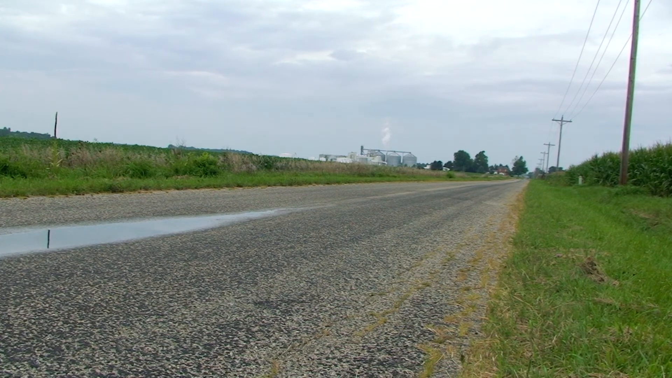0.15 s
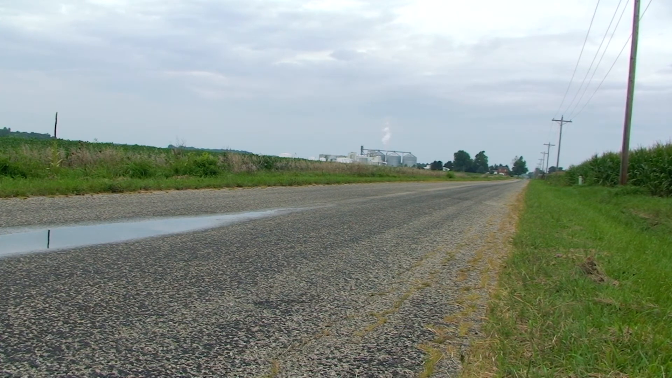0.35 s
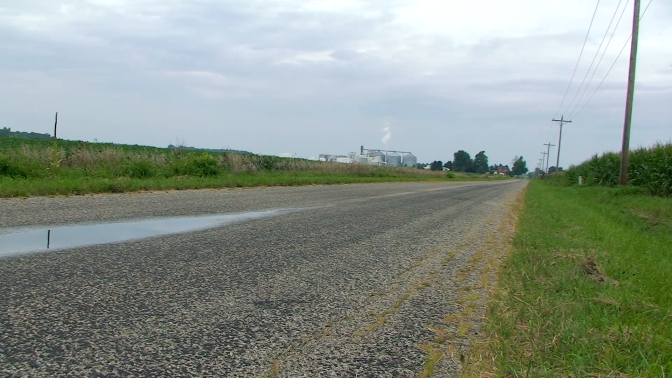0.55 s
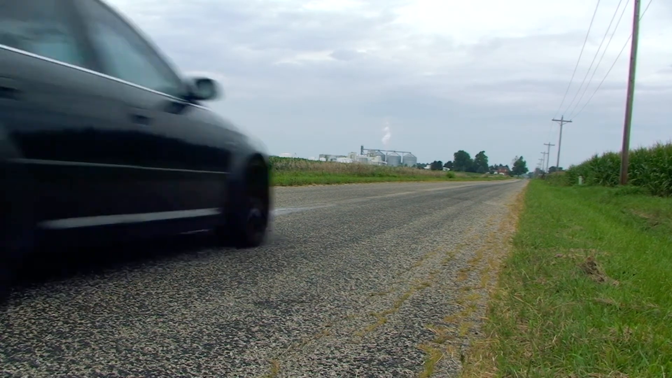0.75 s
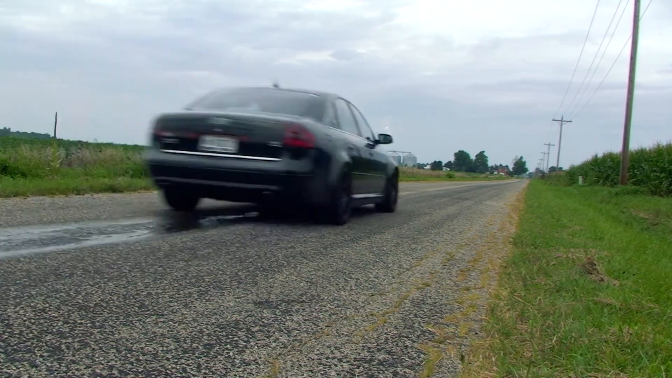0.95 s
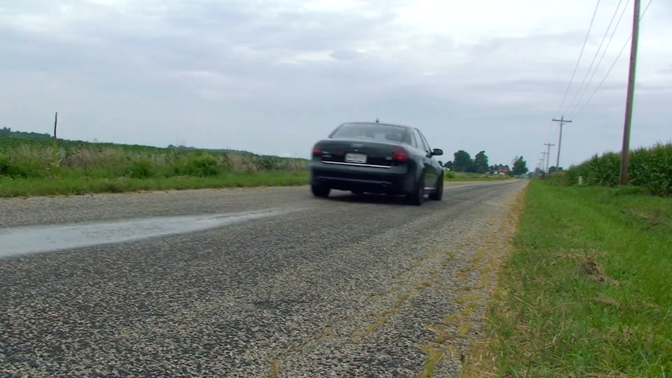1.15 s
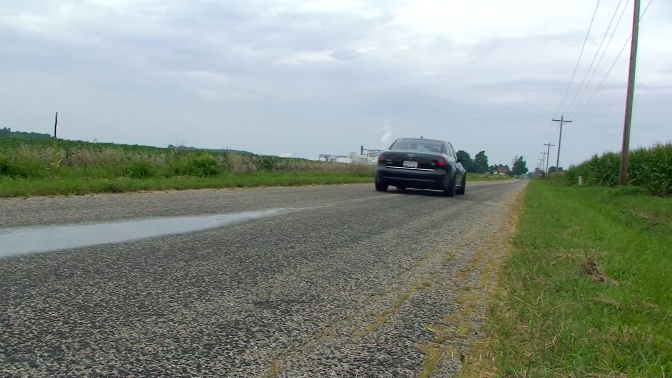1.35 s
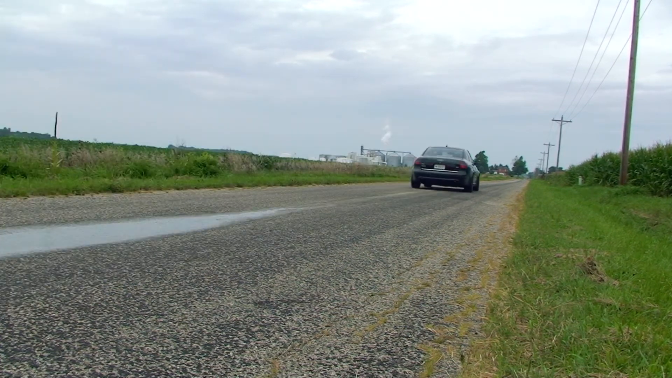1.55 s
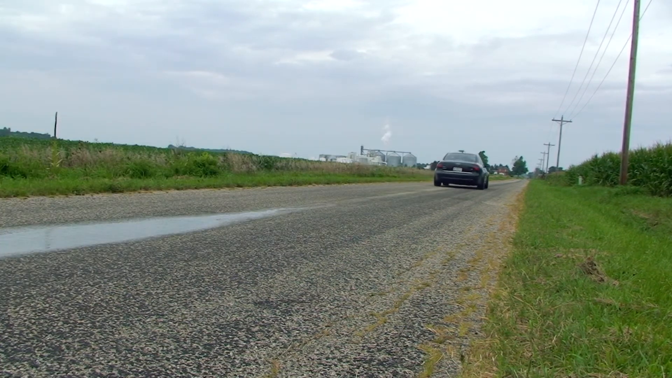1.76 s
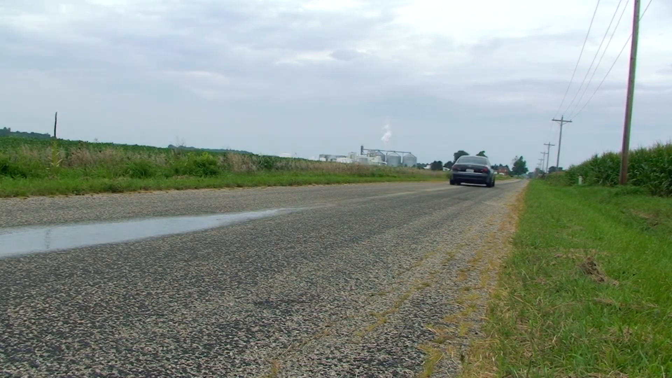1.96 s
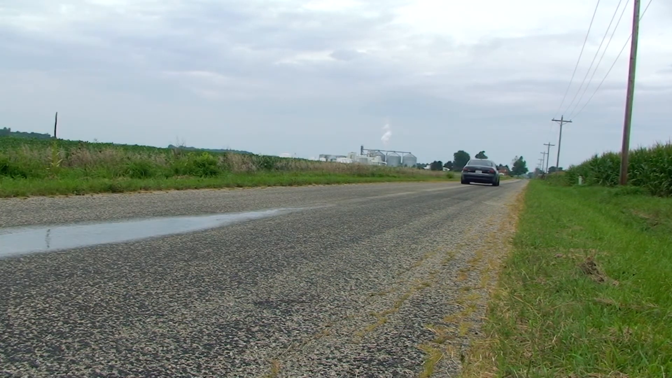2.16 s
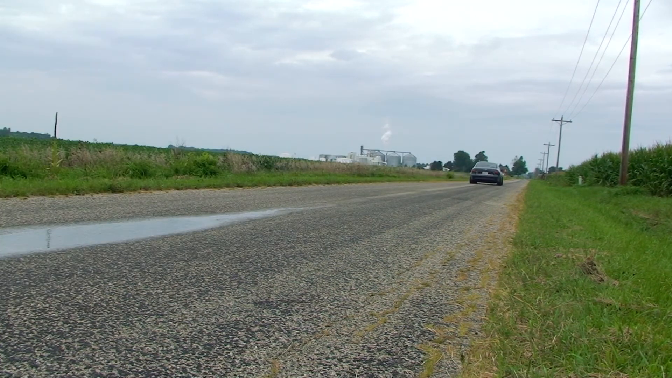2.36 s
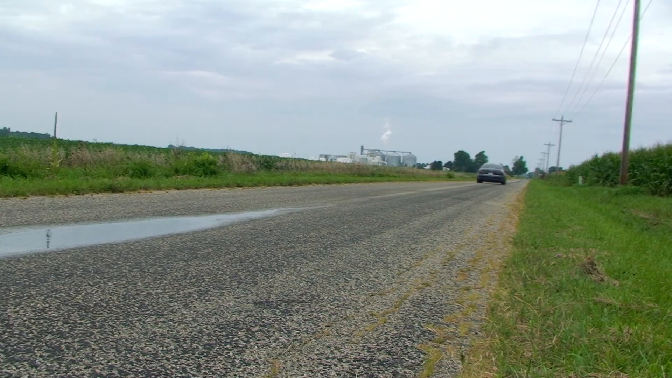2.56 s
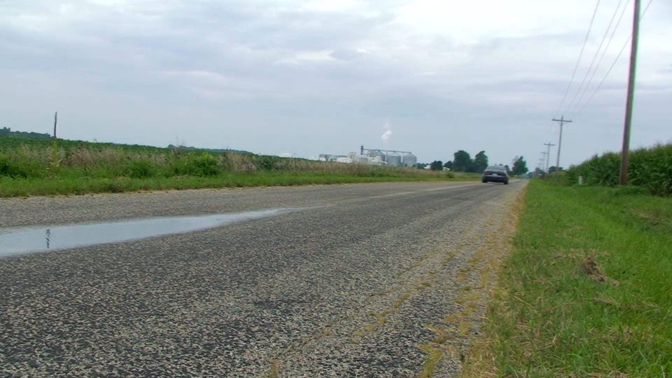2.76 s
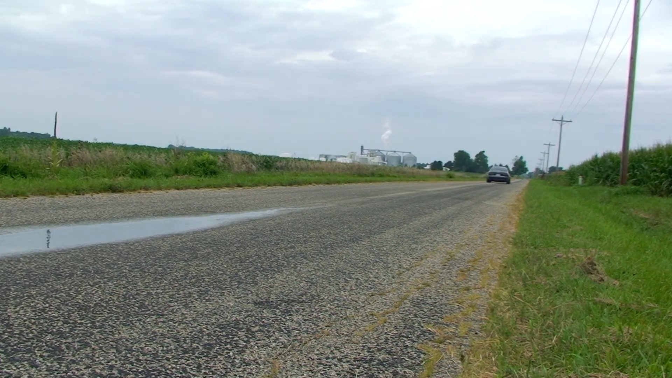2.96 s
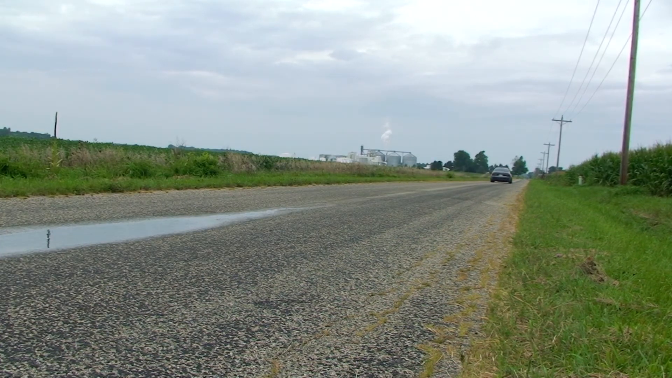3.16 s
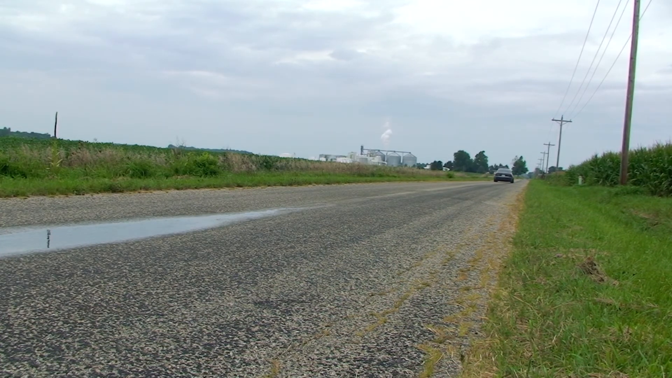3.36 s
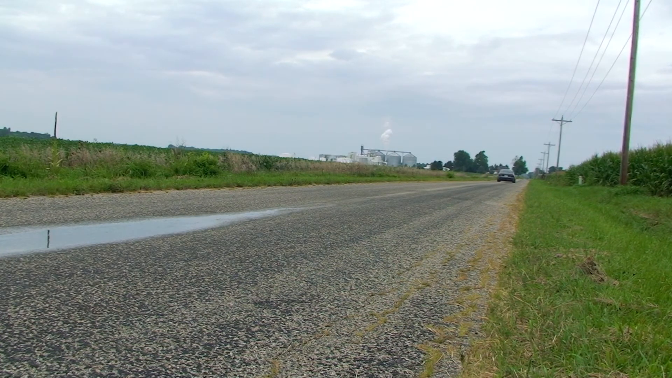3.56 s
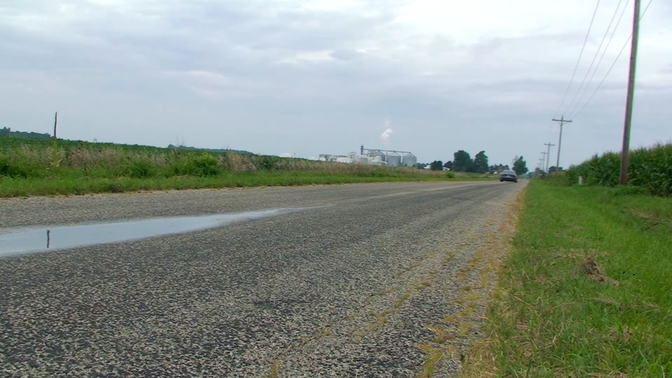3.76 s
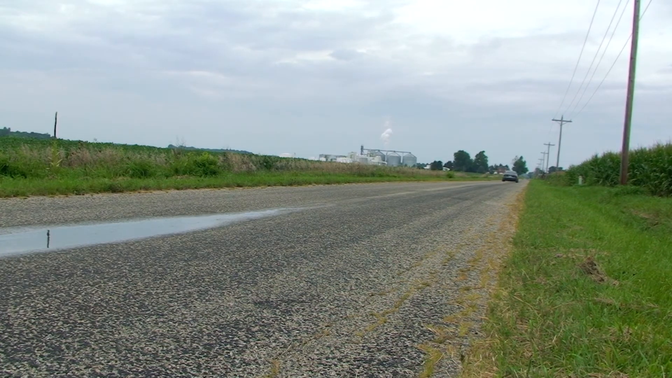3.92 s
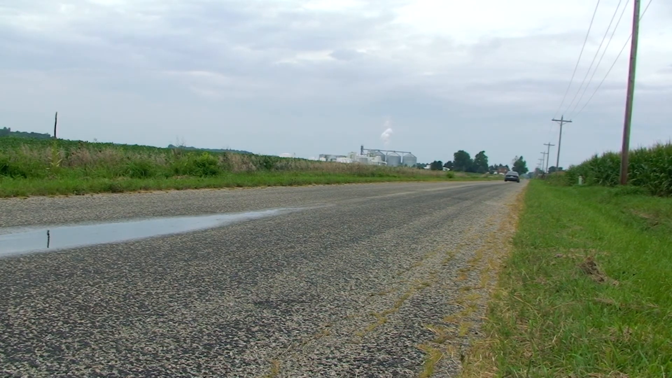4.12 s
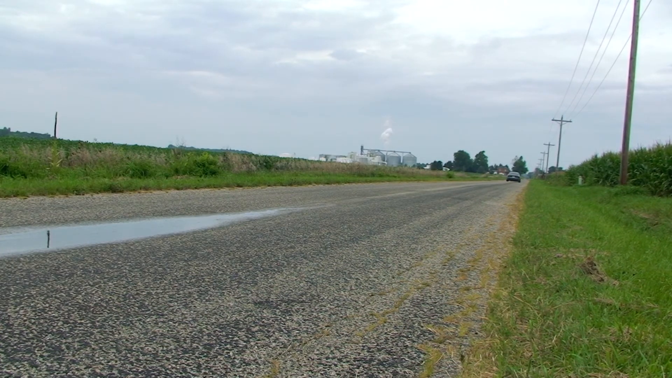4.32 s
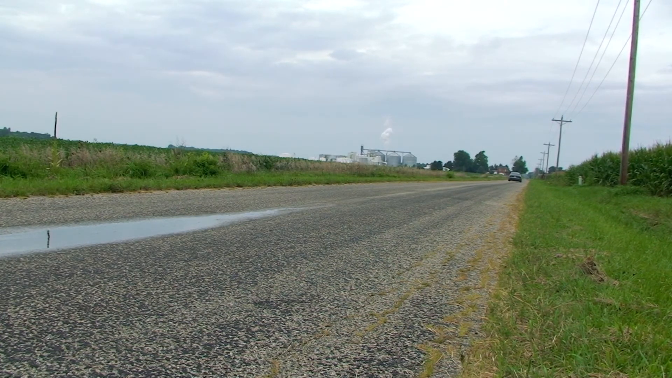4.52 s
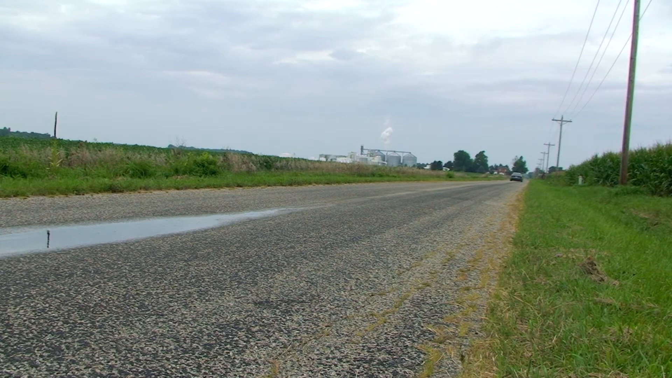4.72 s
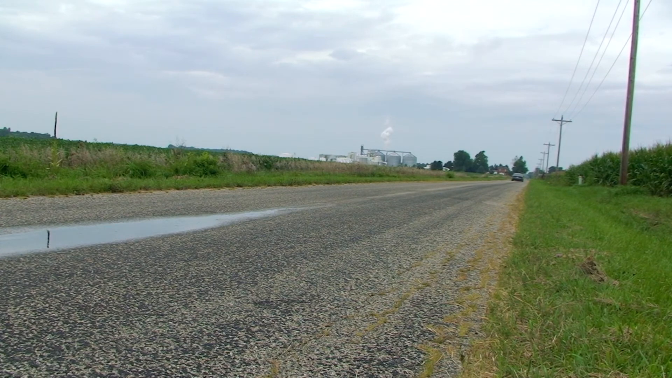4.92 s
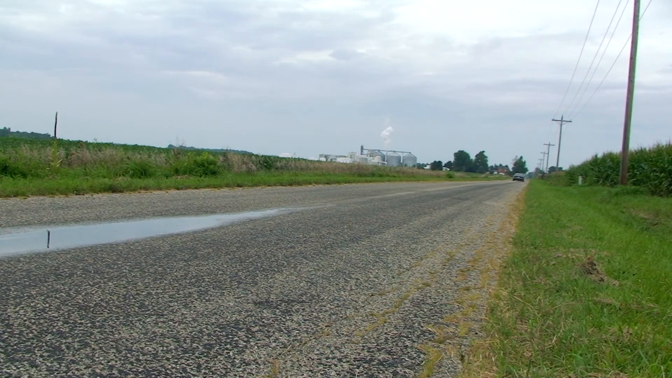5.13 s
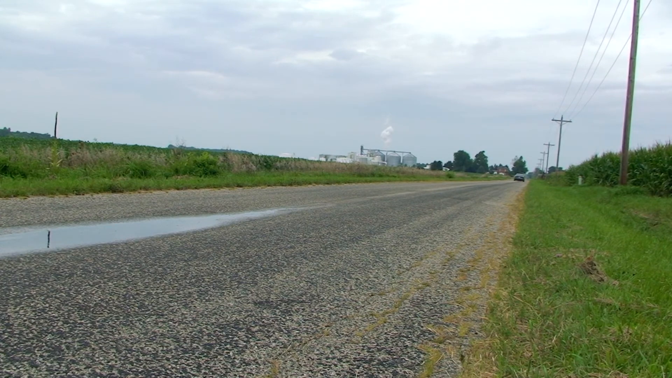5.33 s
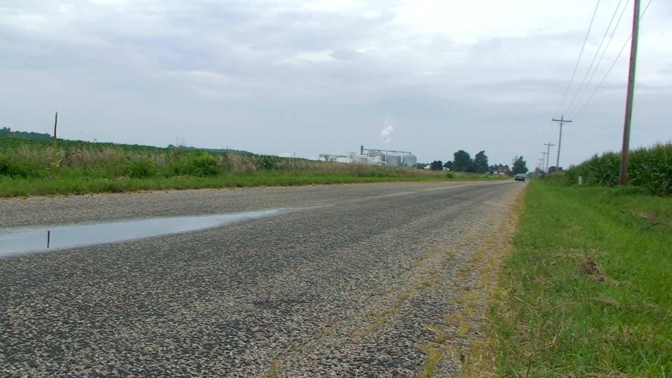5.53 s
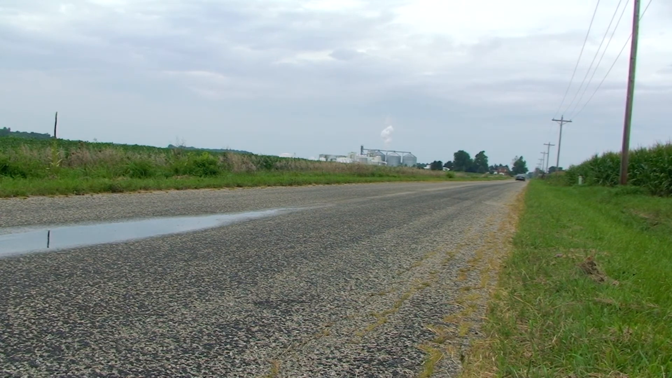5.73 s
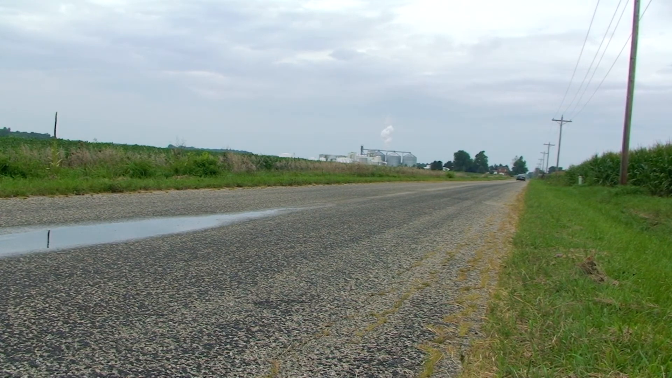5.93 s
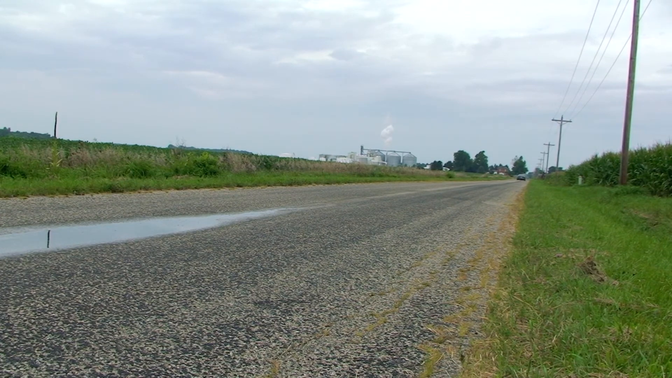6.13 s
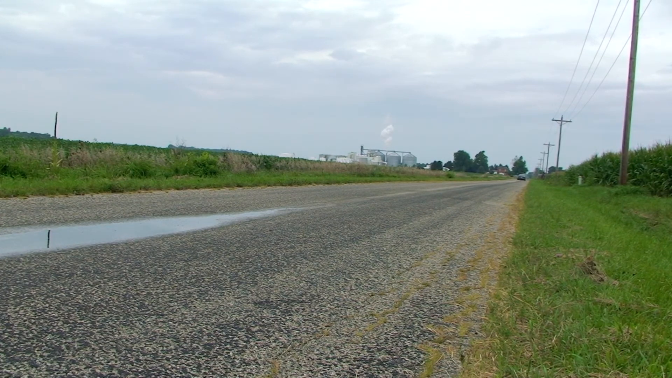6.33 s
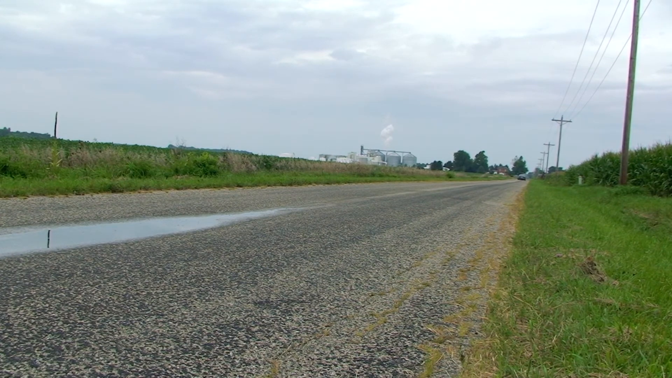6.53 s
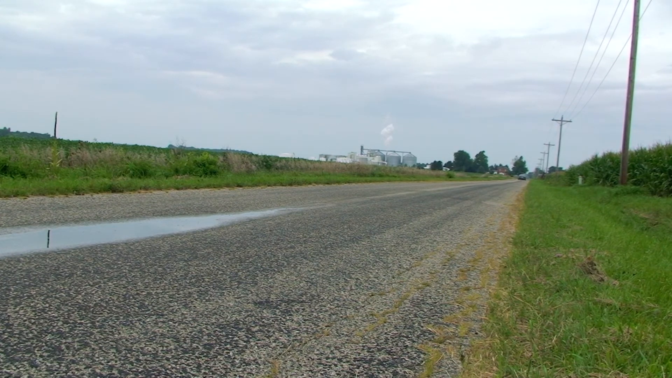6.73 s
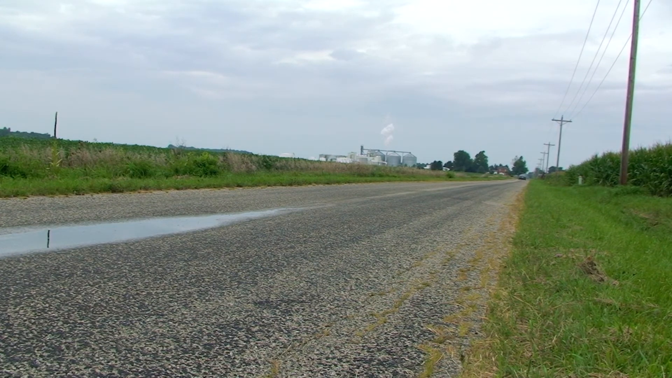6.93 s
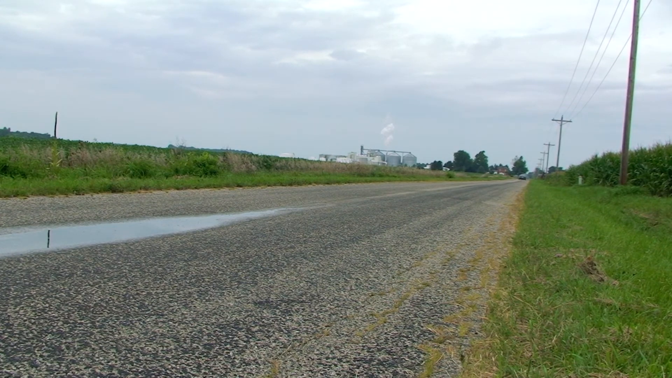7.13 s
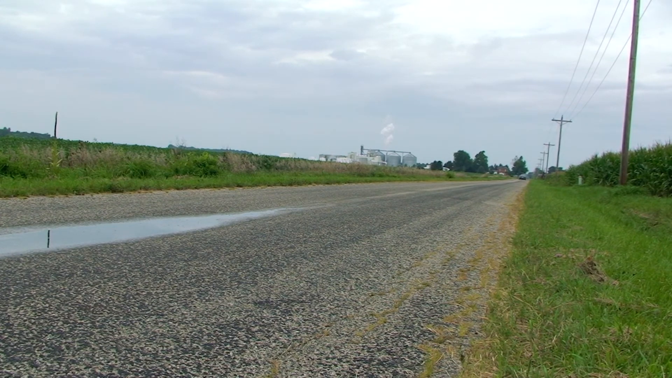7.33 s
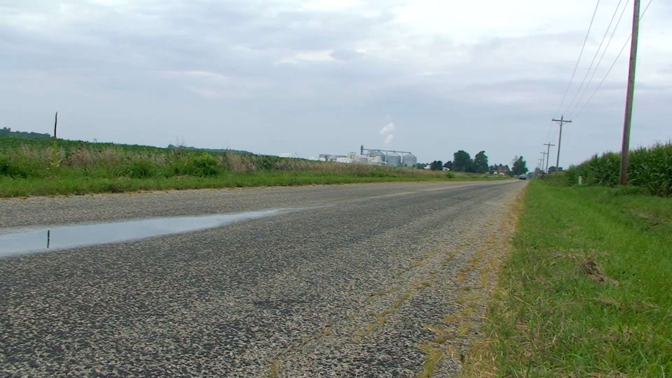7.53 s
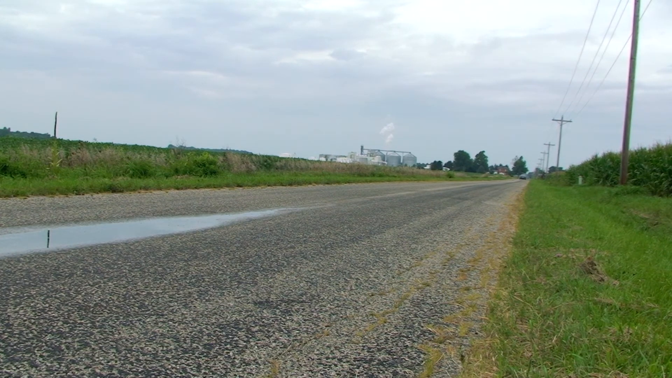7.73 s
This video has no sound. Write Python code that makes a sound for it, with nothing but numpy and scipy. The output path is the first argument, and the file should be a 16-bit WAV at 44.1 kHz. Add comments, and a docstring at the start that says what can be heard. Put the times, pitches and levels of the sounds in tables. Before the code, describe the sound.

A loud V8 car roars past close on the left at full throttle, climbs through its revs, changes gear and recedes as crickets emerge.

```python
"""A V8 saloon with a loud exhaust comes from behind the microphone and passes close on its left at full throttle.
The engine note drops as it goes by, with torn blasts of gas and air, while tyres roar on coarse chip seal.
Down the country road the note climbs with the revs, then slides down into the next gear; crickets in the verge
come through as the car recedes. The engine is a sum of orders of its cycle, with noise ringing in the pipes;
the road is coloured noise that fades with distance, and each cricket is a whistle cut into wing strokes."""
import sys
import numpy as np
from scipy import signal
from scipy.fft import rfft, irfft, next_fast_len
from scipy.io import wavfile
from scipy.ndimage import uniform_filter1d

SR = 44100
rng = np.random.default_rng(int(sys.argv[2]) if len(sys.argv) > 2 else 0)


def unload_wav(signal):
    """Save mono or channel-first audio to the path in sys.argv[1] as 16-bit WAV at rate SR, clipped to [-1, 1]."""
    wavfile.write(
        sys.argv[1],
        SR,
        np.round(np.clip(np.atleast_2d(signal).T, -1, 1) * 32767).astype(np.int16),
    )


N = 347508
T = np.arange(N) / SR  # time [s]

# the car's path: speed, the moment it is abreast of the microphone, its distance then
SPEED_M_S, PASS_S, KERB_M = 24.05, .768, 3.37
SOUND_M_S = 343
BARK_LAG_S = .25  # the bark and the road layers follow the engine's effort later than the boom


# side-on, within this stretch of road, the pipes boom less and bark more
SIDE_ON_AT_M, SIDE_ON_M, SIDE_ON_BOOM_DB, SIDE_ON_BARK_DB = -.5, 5.7, -2.7, 1.5
# just before that the body of the car screens the bark
SCREEN_AT_M, SCREEN_M, SCREEN_DB = -7.2, 3, -3.4
# turbulent share of the exhaust, and what it gains close by, side-on and in the gear change
RASP_DB, RASP_NEAR_DB, RASP_NEAR_M, RASP_SIDE_ON_DB, RASP_SHIFT_DB = -18.2, 4.5, 18, 7, 2
EXHAUST_PAN_SHARE = .46  # the exhaust swings across less than the tyres
# pipe resonances that the turbulence rings: (centre [Hz], width [Hz], level [dB])
PIPE_RESONANCES = [(105, 45, -7), (168, 78, -4), (308, 78, -2), (410, 60, -5), (495, 110, -4),
                   (620, 104, -1), (823, 81, -8)]


def exhaust(cycle_hz, turn, along, shift, rasp_trim_db=-2, puff=0.48):
    """The engine note, and turbulent puffs at each firing that ring the pipes."""
    side_on = bump(along, SIDE_ON_AT_M, SIDE_ON_M, order=6)
    boom_db = carried("boom", along) + SIDE_ON_BOOM_DB * side_on
    bark_db = carried("bark", along, BARK_LAG_S) + SIDE_ON_BARK_DB * side_on
    bark_db = bark_db + SCREEN_DB * bump(along, SCREEN_AT_M, SCREEN_M)

    rough_db = RASP_DB + RASP_NEAR_DB * bump(along, 0, RASP_NEAR_M)
    rough_db = rough_db + RASP_SIDE_ON_DB * side_on + RASP_SHIFT_DB * np.sin(np.pi * shift)
    rough = np.clip(undb(rough_db), 0, .9)
    note = twin_pipes(engine_note(cycle_hz, turn, rough, boom_db, bark_db), along)

    firings = np.cos(2 * np.pi * 8 * turn)  # eight to a cycle
    gas = rng.standard_normal(N) * (1 + puff * firings)
    rasp = 0
    for i, (hz, width, db) in enumerate(PIPE_RESONANCES):
        ring = resonate_twice(gas, hz, 2 * width)
        rasp = rasp + undb(db) * ring * (-1) ** i
    flow = np.hypot(undb(boom_db), undb(bark_db))
    rasp = unit(rasp) * rough * flow * undb(rasp_trim_db)

    pan_db = PAN_FAR_DB + EXHAUST_PAN_SHARE * swing(along)
    return ports(note + crackle(turn) + blasts(along, turn) + rasp, pan_db) * place(0, pan_db)


# engine speed at the car in the low gear: (time [s], cycles of all eight cylinders per second [Hz])
LOW_GEAR = [(0, 36.25), (4.45, 49.05), (4.75, 50.4), (5.13, 50.6)]
# engine speed at the car in the next gear: (time [s], cycles of all eight cylinders per second [Hz])
HIGHER_GEAR = [(5.75, 35.31), (5.92, 36.32), (6.8, 36.03), (7.88, 36.96)]
# the gear change: when the throttle lifts, how long the revs fall, and the power of time by which they fall
LIFT_S, SHIFT_S, SHIFT_POWER = 5.131, .617, 1.9


def engine_speed(along):
    """Doppler-shifted cycle rate, and gear change progress 0-1: the revs climb, then fall into the next gear."""
    shift = np.clip((T - LIFT_S) / SHIFT_S, 0, 1) ** SHIFT_POWER
    hz = (1 - shift) * curves(LOW_GEAR)[0] + shift * curves(HIGHER_GEAR)[0]
    return hz * doppler(along), shift


# the tail pipes trail the middle of the car and pass nearer the microphone
PIPE_AFT_M, PIPE_KERB_M = .5, 2.5


def doppler(along):
    """Pitch heard over pitch sent, from the speed at which the tail pipes recede from the microphone."""
    past = along - PIPE_AFT_M
    return 1 / (1 + SPEED_M_S * past / np.hypot(past, PIPE_KERB_M) / SOUND_M_S)


# how far the pipes spread the orders in time, a row for each voice: (boom, bark [turns per order squared])
ORDER_SMEAR = [(.04, -.02), (-.05, -.06), (.085, -.23), (.185, -.125), (.185, -.075), (-.08, .085),
               (-.185, -.22), (.18, -.065)]


def engine_note(cycle_hz, turn, rough, boom_db, bark_db, waver_db=.7, low_waver_db=.6, scatter=.17, churn=55):
    """Orders of the engine cycle; turbulence frays each one into a narrow band."""
    step, orders = 64, np.arange(1, 33)  # slow changes are worked out every 64 samples
    t, rough = T[::step], rough[::step]
    size = len(t)
    gains = order_gains(t, np.outer(orders, cycle_hz[::step]), boom_db[::step], bark_db[::step])
    crank, spin, out = np.exp(2j * np.pi * turn), 1, 0
    for k, gain in zip(orders, gains):
        spin = spin * crank
        shake = k / 16
        # the pipes delay the orders unequally, which sets how lumpy each cycle is
        smear = np.array(ORDER_SMEAR)[:, int(k >= 12)]
        delay = across_voices(t, np.unwrap(2 * np.pi * smear * k ** 2))
        # high orders waver most in the moving air
        phase = scatter * shake ** 2 * walk(14, size=size) - delay
        waver = undb((low_waver_db + waver_db * shake) * walk(6, size=size))
        turbulence = walk(churn, size=size) + 1j * walk(churn, size=size)
        fray = rough * np.sqrt(shake / 2) * turbulence
        envelope = gain * waver * np.exp(1j * phase) * (np.sqrt(1 - rough ** 2) + fray)
        out = out + np.imag(spin * np.interp(T, t, envelope))
    return out


# voices of the engine, each a table of (order [multiple of the cycle rate], relative level [dB]):
# from ahead, closing in, tail on, from behind, then at low, middle and high revs, and in the next gear
AHEAD = [(2, -20.0), (3, -22.0), (4, -18.0), (5, -15.5), (6, -11.5), (7, -1.0), (8, -5.0), (9, -17.5),
         (10, -13.0), (11, -20.5), (12, -22.5), (13, -15.0), (14, -18.0), (16, 0.0), (17, -7.5), (18, -6.5),
         (21, -13.0), (22, -19.0), (23, -18.5), (24, -19.5), (25, -18.5), (26, -23.5)]
CLOSING = [(2, -19.0), (3, -16.5), (4, -16.0), (5, -14.5), (6, 0.0), (7, 0.0), (8, -0.5), (9, -17.5),
           (10, -12.0), (11, -12.0), (12, -14.5), (13, -12.0), (14, -18), (15, -17), (16, -1.0),
           (17, -14.0), (18, -14.5), (21, -14.5), (23, -22.0), (24, -22.5), (25, -8.0), (26, -16.0)]
TAIL_ON = [(2, -21.5), (3, -19.5), (4, -4.5), (5, -13.0), (6, -1.0), (7, -7.5), (8, -2.5), (9, -6.0),
           (10, -14.5), (11, -12.0), (12, -19.5), (13, -8.0), (14, -6.5), (15, -10.0), (16, -4.0),
           (17, -10.0), (18, -2.0), (19, -12.5), (20, -10.5), (21, -9.0), (22, 0.0), (23, -12.0),
           (24, -17.0), (25, -21.0), (26, -15.0), (27, -17.0), (28, -22.5), (29, -22.5), (30, -10.5),
           (31, -16.0), (32, -21.5)]
BEHIND = [(2, -26.0), (3, -26.0), (4, -5.0), (5, -13.5), (6, 0.0), (7, -11.0), (8, -1.5), (9, -13.5),
          (10, -25.0), (11, -16.5), (12, -20.0), (13, -6.5), (14, -9.0), (15, -6.0), (16, -2.0), (17, -8),
          (18, -15.5), (20, -13.5), (21, -9.0), (22, -12.5), (23, -19.5), (24, -21.0), (26, -19.5),
          (28, -26.0), (29, -21.0), (30, -16.0), (31, -18.5), (32, -14.5)]
LOW_REVS = [(2, -25.5), (3, -20.5), (4, -8.0), (5, -13.0), (6, 0), (7, -10), (8, -3.5), (9, -12), (10, -7),
            (12, -15.5), (13, -6.0), (14, 0.0), (15, -1.5), (16, 0), (17, -7), (18, -14.5), (19, -24.5),
            (20, -11.0), (21, -12.0), (22, -15.0), (23, -17.5), (24, -22.5)]
MID_REVS = [(1, -41), (2, -28.5), (3, -19.5), (4, -17.5), (5, -16), (6, -2.5), (7, -19.5), (8, -5),
            (9, -5.5), (10, -16.5), (11, -18), (12, -8), (13, -12), (14, 1.5), (15, -14), (16, -9),
            (17, -6), (18, -10), (19, -24), (20, -14), (21, -15), (22, -19.5), (23, -17), (24, -11),
            (25, -18), (26, -18), (27, -24), (28, -21)]
HIGH_REVS = [(1, -37), (2, -29), (3, -19), (4, -19.5), (5, -20.5), (6, -6), (7, -22), (8, 0), (9, -14),
             (10, -11), (11, -14.5), (12, -1.5), (13, -8.5), (14, 0), (15, -20.5), (16, -2.5), (17, -7),
             (18, -10.5), (19, -14), (20, -8.5), (21, -12.5), (22, -7), (23, -13), (24, -11), (25, -12),
             (26, -20), (27, -22), (28, -18)]
NEXT_GEAR = [(1, -25), (2, -26), (3, -30), (4, -19), (5, -25), (6, -8), (7, -15), (8, -1.5), (9, -21),
             (10, -10), (11, -23), (12, 0.5), (13, -6), (14, -3), (15, -9.5), (16, -2.5), (17, -4.5),
             (18, 1.5), (19, -4.5), (20, 0), (22, -5)]
# bands of the note that sing out or sink as the car turns its side and tail, draws away and changes gear:
# (time of centre [s], length [s], centre [Hz], width [Hz], boost [dB])
FLARES = [(.03, 0.11, 696, 28, 3), (.59, .05, 680, 20, 17), (.67, .04, 630, 18, 7), (.71, .06, 595, 20, 15),
          (.66, .15, 715, 18, -12), (.76, .04, 470, 18, 15), (.77, .03, 315, 20, 5),
          (.67, .04, 320, 25, -7), (.86, .04, 300, 20, -5), (.825, .03, 830, 24, 8),
          (.875, .025, 555, 20, 9), (.925, .05, 585, 20, 9), (1.01, .11, 815, 20, 4),
          (1.02, .05, 665, 18, 4), (2.3, .12, 520, 15, -5), (2.7, .15, 535, 15, 7), (3.55, .4, 1045, 35, 6),
          (5.42, .15, 1080, 250, -8), (5.45, .12, 625, 25, 7), (5.6, .1, 605, 40, 10),
          (5.56, .1, 505, 25, -7), (5.6, .2, 215, 40, 4)]


def order_gains(t, hz, boom_db, bark_db, split_hz=430):
    """Strength of each order: the voice of the moment, its flaring bands, and the loudness of boom and bark."""
    tables = (AHEAD, CLOSING, TAIL_ON, BEHIND, LOW_REVS, MID_REVS, HIGH_REVS, NEXT_GEAR)
    voices = [{round(k): db for k, db in table} for table in tables]
    # orders missing from a voice stay at -38 dB
    db = np.array([across_voices(t, [v.get(k + 1, -38) for v in voices]) for k in range(len(hz))])
    for s, length, centre, width, boost in FLARES:
        db = db + boost * np.exp(-((t - s) / length) ** 2) / (1 + ((hz - centre) / width) ** 2)
    upper = 1 / (1 + (split_hz / hz) ** 12)
    gains = 0
    for share, level_db in ((1 - upper, boom_db), (upper, bark_db)):
        part = undb(db) * share
        # the level is that of the orders below 800 Hz
        rms = np.sqrt(np.sum(part ** 2 * (hz < 800), axis=0) / 2)
        gains = gains + part * undb(level_db) / rms
    return gains


# when each voice holds: (from [s], to [s])
VOICE_SPANS = [(0, .2), (.33, .52), (.86, 1.06), (1.2, 1.5), (1.95, 2.65), (3.25, 3.95), (4.7, 5.25),
               (5.75, 7.8)]


def across_voices(t, values):
    """One value for each voice, held through its span and blended between spans."""
    return np.interp(t, np.ravel(VOICE_SPANS), np.repeat(values, 2))


# the two tail pipes: their spacing, how strongly the far one is heard, and within what stretch of road
PIPE_GAP_M, FAR_PIPE_SHARE, FAR_PIPE_REACH_M = .97, .7, 6


def twin_pipes(note, along, boom_hz=420):
    """The far pipe's boom arrives later than the near one's, so low orders cancel and return as the car sweeps by."""
    lag_s = PIPE_GAP_M * KERB_M / np.hypot(along, KERB_M) / SOUND_M_S
    share = FAR_PIPE_SHARE * bump(along, 0, FAR_PIPE_REACH_M, order=4)
    boom = signal.sosfiltfilt(signal.butter(6, boom_hz, fs=SR, output="sos"), note)
    both = boom + share * np.interp(T - lag_s, T, boom)
    return note - boom + both / np.hypot(1, share)


# hard rasp that tears out once a cycle under load and dies away after the lift: (time [s], level [dB])
CRACKLE = [(0, -35), (1.2, -32), (2.3, -39), (3.1, -41), (3.6, -37), (4.3, -36), (4.8, -31.5), (5.2, -29.5),
           (5.33, -42), (5.7, -55)]
CRACKLE_HZ, CRACKLE_WIDTH_HZ, CRACKLE_FOCUS = 1060, 420, .75


def crackle(turn):
    """One hard burst of gas in each engine cycle, ringing the tail pipes briefly."""
    ring = resonate_twice(rng.standard_normal(N), CRACKLE_HZ, CRACKLE_WIDTH_HZ)
    # squashed to bursts of much the same strength
    even = resonate(np.tanh(unit(ring)), CRACKLE_HZ, 2 * CRACKLE_WIDTH_HZ)
    once_a_cycle = np.exp(CRACKLE_FOCUS * np.cos(2 * np.pi * turn))
    return unit(even * once_a_cycle) * undb(curves(CRACKLE)[0])


# torn blasts of gas and air as the car sweeps past the microphone:
# (time of centre [s], length [s], centre at the source [Hz], width [Hz], level [dB])
BLASTS = [(.61, .03, 115, 50, -29), (.61, .055, 610, 50, -22), (.67, .045, 620, 45, -19.5),
          (.72, .1, 390, 170, -27), (.76, .03, 560, 70, -23), (.69, .02, 130, 50, -25),
          (.82, .05, 1850, 700, -29), (.835, .025, 470, 90, -21), (.875, .025, 540, 70, -20.5),
          (.86, .04, 155, 30, -26), (.92, .1, 1000, 280, -28)]


def blasts(along, turn, throb=.6):
    """Short roars of turbulence that throb with the engine cycle and swoop down with the Doppler shift."""
    sent_s = np.cumsum(doppler(along)) / SR
    out = 0
    for s, length, hz, width, db in BLASTS:
        band = unit(resonate_twice(rng.standard_normal(N), hz, 1.5 * width))
        out = out + np.interp(sent_s, T, band) * undb(db) * bump(T, s, length)
    return out * unit(1 + throb * np.cos(2 * np.pi * turn))


# spectra of the road noise, each: (frequency [Hz], relative level [dB])
RUMBLE = [(15, -10.5), (38, 4), (60, 8), (125, 8.5), (180, -5.5), (400, -45.5)]
ROAR = [(80, -24.5), (200, -25.5), (400, -14.5), (750, -4.5), (1020, 1), (1300, -1), (1650, -4.3),
        (2100, -12.5), (3000, -29.5), (6000, -74)]
HISS = [(1200, -23), (2200, 2), (3200, -0.5), (4200, -6.5), (5200, -10.5), (8000, -17), (12000, -56)]
SIZZLE = [(3000, -10), (5000, 6), (6600, 10), (8000, 4.5), (9500, 2), (12000, -1.5), (13500, -10),
          (16000, -15)]
# tread roar along the same path: (time [s], level [dB])
TREAD = [(.5, -1), (1.2, -.3), (1.5, -1.3), (1.8, .2), (2.5, -1.3), (3.4, -1.5), (4.8, -2), (5.55, 1),
         (6.1, 0), (6.9, -.3), (7.88, .4)]
# treble of the road, which swells and fades far down it: (time [s], level [dB])
TREBLE = [(1.3, 0), (1.85, -1.2), (2.15, 2.3), (2.5, -1.2), (2.95, -5), (3.3, -.5), (3.9, 1), (4.8, 2),
          (5.55, -.5), (5.85, -4), (6.3, -.5), (6.95, 3), (7.06, -2.5), (7.17, 2.5), (7.35, -2.5),
          (7.6, -4), (7.88, -1.5)]
# the tyres flick up wet grit further on: (time of centre [s], length [s], boost [dB])
SPLASHES = [(1.42, .025, 4), (2.17, .035, 6)]
# grit sprays from the tyres as they roll by: where along the road, over what stretch, how much louder
SPRAY_AT_M, SPRAY_M, SPRAY_DB = -2.8, 2.2, 5
# puffs of air on the microphone, the first from the car's wake: (time of centre [s], length [s], level [dB])
GUSTS = [(.8, .07, -46), (2.4, .25, -55), (3.75, .12, -59), (4.5, .13, -58), (5.1, .15, -59),
         (6.55, .15, -60), (7.4, .15, -55)]
BREEZE_DB = -64


def road(turn, along, throb=.08, grain_db=2.0, fading=0.17, absorb=.35, edge_hz=2000, edge_share=.5):
    """Pushed air, tread roar, hiss and a sizzle of grit; the roar throbs a little with the engine."""
    layers = ("rumble", "roar", "hiss", "sizzle")
    air_db, tread_db, hiss_db, grit_db = (carried(layer, along, BARK_LAG_S) for layer in layers)
    treble_db, = curves(TREBLE)
    pan_db = PAN_FAR_DB + swing(along)
    far = T / T[-1]

    roar = noise(ROAR, width=.06)
    # over a longer path, moving air lets parts of the roar swell and fade on their own
    drift = sum(walk(8) * resonate(roar, hz, hz / 4) for hz in np.geomspace(750, 2000, 5))
    roar = roar + fading * np.sqrt(far) * drift
    # its upper edge swells and fades with the treble
    roar = roar + (undb(edge_share * treble_db) - 1) * resonate(roar, edge_hz, 800)
    beat = 1 + throb * np.cos(2 * np.pi * 3 * turn)  # three to a cycle
    tread_db = tread_db + curves(TREAD)[0] + .6 * walk(12)

    hiss = noise(HISS, width=.04)
    # distance takes the top off the hiss
    hiss = hiss - absorb * far ** 2 * resonate(hiss, 4600, 2000)

    grit_db = grit_db + SPRAY_DB * bump(along, SPRAY_AT_M, SPRAY_M)
    grit_db = grit_db + sum(db * bump(T, s, length) for s, length, db in SPLASHES)
    wind = undb(BREEZE_DB) + sum(undb(db) * bump(T, s, length) for s, length, db in GUSTS)

    out = noise(RUMBLE, width=.22) * undb(air_db) + noise(RUMBLE, width=.8) * wind
    out += ports(roar, pan_db) * beat * place(tread_db, pan_db)
    out += hiss * place(hiss_db + treble_db + walk(20), pan_db)
    return out + noise(SIZZLE, width=.12) * undb(grit_db + grain_db * walk(500))


# how each layer of the car carries to the microphone, by name: (level within reach before effort [dB],
# where along the road [m], reach [m], fall per tenfold distance [dB], share of the effort)
CARRY = {"boom": (-17.5, 0, 16, 20.7, 1), "bark": (-20.5, -4, 55, 29.5, 1), "rumble": (-45, -5, 11, 30, 0),
         "roar": (-24.2, -.5, 4.6, 6.7, .45), "hiss": (-33.4, -5, 12, 16.6, .6),
         "sizzle": (-37.8, -8, 14, 42, 0)}
# how hard the engine sounds, dropping at the lift: (time [s], level [dB])
EFFORT = [(0, 2.5), (.35, -.2), (1.3, 1), (2.45, -.7), (4.3, 2.4), (5.2, 5.2), (5.53, -1.4), (7.1, -2.1),
          (7.88, -4)]


def carried(layer, along, lag_s=0):
    """Level of a layer in dB: steady within its reach, falling beyond, and following the engine's effort."""
    db, at_m, reach_m, fall_db, share = CARRY[layer]
    effort_db = np.interp(T - lag_s, *np.transpose(EFFORT))
    distance = np.hypot(1, (along - at_m) / reach_m)
    return db - fall_db * np.log10(distance) + share * effort_db


# left minus right for the tyres: far down the road, added while still behind the microphone, added when abreast
PAN_FAR_DB, PAN_BEHIND_DB, PAN_ABREAST_DB = -.6, 5.7, 11.3
NOSE_M = 3.1  # the front tyres pass first


def swing(along):
    """How far the car is to the left, in dB: it comes from behind, is widest abreast and ends ahead."""
    bearing = np.arctan2(KERB_M, along + NOSE_M)
    return PAN_BEHIND_DB * np.sin(bearing / 2) ** 2 + PAN_ABREAST_DB * np.sin(bearing) ** 2


# level of all the insects in the verge: (time [s], level [dB])
CHORUS = [(0, -57), (3, -57.5), (5, -54), (7.88, -51)]
# spectrum of the far insects: (frequency [Hz], relative level [dB])
CHORUS_COLOUR = [(3500, -38), (5300, -17), (5850, -1), (6700, 0), (7600, -1.5), (8200, 2), (8600, -10.5),
                 (9100, -39.5), (11000, -40), (11800, -21), (15700, -30)]
# nearer insects that call in strokes: (mean stroke rate [per second], time of one stroke [s], top pitch [Hz],
# fall [Hz], sounding share [0-1], where in the stroke the pitch tops [0-1], buzz [Hz], level in the chorus [dB])
CRICKETS = [(30, 6.89, 6220, 330, .55, .3, 35, -10.5), (14.9, 6.945, 7900, 500, .55, .45, 100, -4.5),
            (15.05, 6.915, 7260, 550, .45, .28, 65, -5.5), (31, 6.9, 7900, 500, .5, .35, 90, -7.5),
            (2.89, 6.91, 8480, 60, .3, .5, 190, -14), (4.22, 6.9, 5550, 400, .22, .95, 20, -24),
            (4.8, 6.89, 6500, 250, .22, .9, 25, -18), (4.6, 6.85, 5870, 150, .2, .9, 25, -21),
            (2.1, 6.87, 4920, 30, .35, .5, 50, -25)]


def crickets(blur_db=-2.3, unsteady=.014, aside_db=3):
    """Wing strokes are short whistles, rising, arching or sagging with wing speed; far ones merge into a hiss."""
    out = noise(CHORUS_COLOUR, width=.35) * undb(blur_db)
    for i, (rate, s, hz, fall_hz, share, crest, buzz_hz, db) in enumerate(CRICKETS):
        strokes = np.cumsum(rate * (1 + unsteady * walk(5))) / SR
        stroke = (strokes - np.interp(s, T, strokes) + share / 2) % 1
        progress = np.minimum(stroke / share, 1)  # 1 is the silence after the stroke
        sag = ((progress - crest) / max(crest, 1 - crest)) ** 2
        pitch = hz - fall_hz * sag + buzz_hz * walk(600)
        tone = np.sin(2 * np.pi * np.cumsum(pitch) / SR)
        whistle = np.sin(np.pi * progress) * tone * undb(walk(18) + .5 * walk(3))
        pan_db = np.full(N, aside_db * (-1) ** i)  # they sit to either side in turn
        out += ports(unit(whistle), pan_db) * place(db, pan_db)
    return out * undb(curves(CHORUS)[0])


def place(db, pan_db):
    """Left and right gains for a level and a direction."""
    return undb(db + np.array([pan_db, -pan_db]) / 2)


def ports(x, pan_db, lag_per_db=8e-6):
    """A source off to one side reaches the nearer microphone port a little earlier."""
    lead = lag_per_db * pan_db / 2
    left, right = np.broadcast_to(x, (2, N))
    return np.array([np.interp(T + lead, T, left), np.interp(T - lead, T, right)])


def noise(colour, width=.1):
    """Two channels of noise with a (Hz, dB) spectrum; width is the share that differs between them."""
    hz, db = np.transpose(colour)
    size = next_fast_len(N, True)
    bins_hz = np.arange(size // 2 + 1) * SR / size
    gain = undb(np.interp(np.log(bins_hz + 1), np.log(hz), db))
    mid, side = irfft(rfft(rng.standard_normal((2, size))) * gain, size)[:, :N]
    return unit(mid + width * np.array([side, -side]))


def resonate(x, hz, width):
    """One resonance, gain 1 at its centre."""
    return signal.lfilter(*signal.iirpeak(hz, hz / width, fs=SR), x)


def resonate_twice(x, hz, width):
    """The same resonance twice over, for steeper skirts."""
    return resonate(resonate(x, hz, width), hz, width)


def walk(rate, size=N):
    """Smooth chance with a spread near 1, changing about rate times a second, on size points across the scene."""
    k = max(int(size / T[-1] / rate), 2)
    knots = rng.standard_normal(size // k + 2)
    line = np.interp(np.arange(size) / k, np.arange(len(knots)), knots)
    return 1.2 * uniform_filter1d(line, k // 2 + 1)


def bump(x, centre, width, order=2):
    """1 at the centre, falling away over the width; a higher order gives a flatter top."""
    return np.exp(-np.abs((x - centre) / width) ** order)


def curves(table):
    """Each column of a time table, joined by straight lines."""
    s, *columns = np.transpose(table)
    return [np.interp(T, s, c) for c in columns]


def unit(x):
    """Scale to rms 1."""
    return x / np.sqrt(np.mean(x ** 2))


def undb(db):
    """Decibels to gain."""
    return 10 ** (np.asarray(db) / 20)


def scene():
    """The car on the road, with the insects beside it."""
    along = SPEED_M_S * (T - PASS_S)  # metres past the microphone
    cycle_hz, shift = engine_speed(along)
    turn = np.cumsum(cycle_hz * (1 + .0015 * walk(30))) / SR  # engine cycles, slightly uneven
    return exhaust(cycle_hz, turn, along, shift) + road(turn, along) + crickets()


TOP_HZ = 15700


def record(dry, ceiling=.85, self_noise_db=-77):
    """The microphone's electronics add a faint hiss, round the highest peaks and cut the top."""
    heard = ceiling * np.tanh(dry / ceiling) + undb(self_noise_db) * rng.standard_normal(N)
    return signal.sosfilt(signal.ellip(8, .2, 80, TOP_HZ, fs=SR, output="sos"), heard)


dry = scene()
out = record(dry)
unload_wav(out)
```